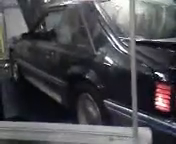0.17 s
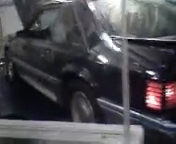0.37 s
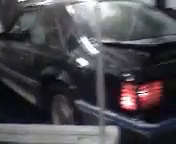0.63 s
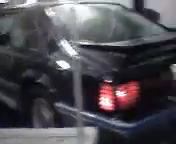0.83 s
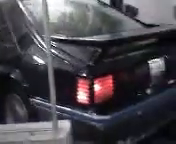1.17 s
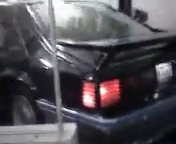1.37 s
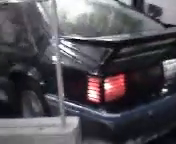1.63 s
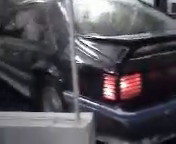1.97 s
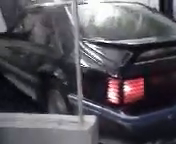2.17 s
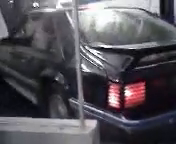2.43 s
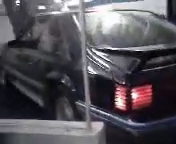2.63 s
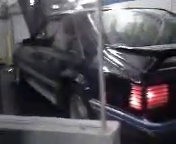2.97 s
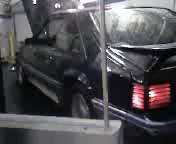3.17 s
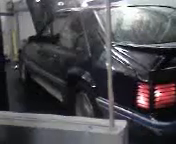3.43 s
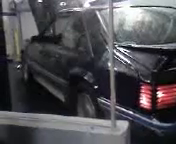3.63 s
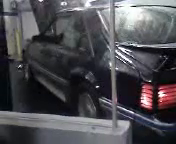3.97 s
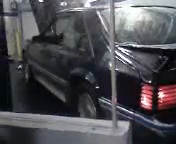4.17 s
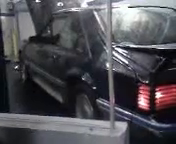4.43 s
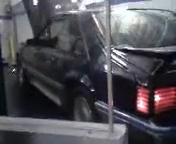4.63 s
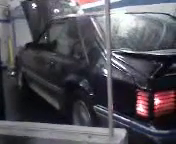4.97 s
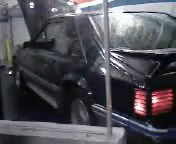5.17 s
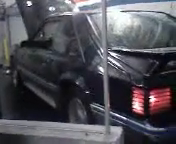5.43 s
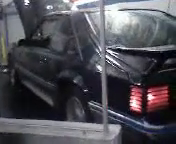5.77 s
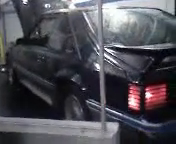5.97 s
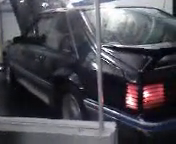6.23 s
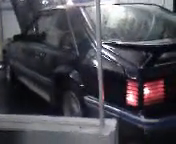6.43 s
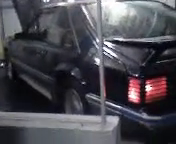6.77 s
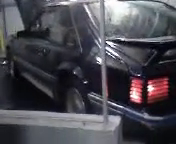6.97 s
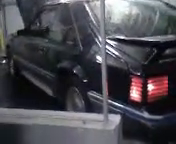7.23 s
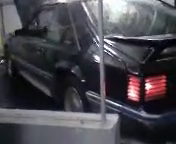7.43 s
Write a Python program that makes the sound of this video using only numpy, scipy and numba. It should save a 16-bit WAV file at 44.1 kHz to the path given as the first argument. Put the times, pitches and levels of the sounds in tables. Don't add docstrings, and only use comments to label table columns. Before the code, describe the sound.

A V8 car pulls hard on workshop rollers, its uneven exhaust note climbing under a loud tyre roar with squeals and brief overload.

```python
import sys
import numpy as np
from scipy import signal
from scipy.fft import rfft, irfft, next_fast_len
from scipy.io import wavfile
from scipy.ndimage import uniform_filter1d
from numba import njit

SR = 44100
rng = np.random.default_rng(int(sys.argv[2]) if len(sys.argv) > 2 else 0)


def generate_wav(sig):
    pcm = np.round(np.clip(np.atleast_2d(sig).T, -1, 1) * 32767).astype(np.int16)
    wavfile.write(sys.argv[1], SR, pcm)


def attenuation_scalar(level_db):
    decades = np.asarray(level_db, float) / 20
    return 10 ** decades


N = 334703
CEILING = 0.71


def unit(x):
    return x / np.sqrt(np.mean(x ** 2))


def level_out(x):
    return x / np.sqrt(uniform_filter1d(x ** 2, size=20000))


def curves(table):
    s, *columns = np.transpose(table)
    return [np.interp(np.arange(N) / SR, s, c) for c in columns]


@njit
def svf(x, hz, width):
    y, b, l = np.empty(len(x)), 0., 0.
    for i in range(len(x)):
        g = np.tan(np.pi * hz[i] / SR)
        k = width / hz[i]
        v = (b + g * (x[i] - l)) / (1 + g * (g + k))
        b, l = 2 * v - b, l + 2 * g * v
        y[i] = k * v
    return y


def band(x, hz, width):
    return svf(x, hz * np.ones(N), 1. * width)


def colour(x, table):
    size = next_fast_len(N)
    hz, db = np.transpose(table)
    log_hz = np.log(np.fft.rfftfreq(size, 1 / SR) + 1)
    gain = attenuation_scalar(np.interp(log_hz, np.log(hz), db))
    return irfft(rfft(x, size) * gain, size)[:N]


def walk(rate, size=N):
    k = int(SR / rate)
    steps = np.repeat(rng.standard_normal(size // k + 2), k)
    return 1.37 * uniform_filter1d(uniform_filter1d(steps, k), k)[:size]


def swell(start, length):
    return np.sin(np.pi * np.clip((np.arange(N) / SR - start) / length, 0, 1))


def clatter(cycle_hz):
    steps = 512
    place = np.cumsum(cycle_hz) / SR * steps
    pattern = uniform_filter1d(rng.standard_normal((260, steps)), size=7, axis=0).ravel()
    return unit(np.interp(place, np.arange(pattern.size), pattern))


def rollers(cycle_hz):
    # (time [s], level [dB])
    load = [(0, -20.5), (.3, -20.5), (2.3, -19), (3, -18.5), (3.7, -17), (5, -16.5), (6, -15.5),
            (6.7, -15.5), (6.9, -16), (7.59, -14.5)]
    # (multiple of cycle rate, width [Hz], boost [dB], change over the pull [dB])
    hums = [(34.3, 120, 2.5, 5), (53.9, 110, 3, -2), (58.8, 80, 5, -0.5), (69, 60, 1, 4.5), (81, 160, 5, 2),
            (116, 72, 3, -4)]
    # (centre [Hz], width [Hz], boost [dB], change over the pull [dB])
    shell = [(804, 12, 6.5, -2.5), (1096, 60, 4.5, 4), (1241, 25, 3.5, -1), (1740, 50, 3, -1),
             (1928, 100, 4, 2.5), (2100, 62, 2.5, 1), (2500, 48, -0.5, -4), (3350, 200, 1.5, 0)]
    # (frequency [Hz], density [dB per Hz])
    roar_spectrum = [(300, -26), (500, -7), (640, -12.5), (910, -13.5), (1160, -12), (1320, -8), (1620, -6),
                     (1870, -3), (2110, -4), (2370, -7), (3230, -14.5), (4500, -22), (6000, -51.5)]
    pull = np.arange(N) / N - .5
    roar = rng.standard_normal(N) + attenuation_scalar(-7.5) * clatter(cycle_hz)
    for multiple, width, boost_db, change_db in hums:
        boost = attenuation_scalar(boost_db + change_db * pull + 0.99 * walk(6.8)) - 1
        roar = roar + boost * band(roar, multiple * cycle_hz, width)
    for hz, width, boost_db, change_db in shell:
        boost = attenuation_scalar(boost_db + change_db * pull + 1.2 * walk(5)) - 1
        roar = roar + boost * band(roar, hz * (1 + 0.0058 * walk(2.5)), width)
    for hz in (1517, 1795, 2145, 2590, 3103):
        roar = roar + attenuation_scalar(-4 + 3 * walk(18)) * band(roar, hz * (1 + .03 * walk(12)), 60)
    for hz, patchy_db in [(900, 3.4), (1400, 1.9), (2300, 1.6), (3000, 2.6), (4100, 4.6)]:
        patches = (0.33 * walk(14) + walk(45)) / 1.28
        roar = roar + (attenuation_scalar(patchy_db * patches) - 1) * band(roar, hz, hz / 4)
    roar = colour(roar, roar_spectrum)
    upper_db = 2.3 + .35 * (cycle_hz - 25) + .7 * walk(5)
    top_db = -3.5 + 1.5 * walk(6)
    upper = signal.sosfilt(signal.butter(3, 2450, "high", fs=SR, output="sos"), roar)
    top = signal.sosfilt(signal.butter(3, 3600, "high", fs=SR, output="sos"), roar)
    roar += (attenuation_scalar(upper_db) - 1) * (upper - top) + (attenuation_scalar(top_db) - 1) * top
    return attenuation_scalar(curves(load)[0] + .5) * level_out(roar)


def squeals():
    # (start [s], length [s], start frequency [Hz], end frequency [Hz], level [dB])
    tones = [(0, 0.83, 1686, 1707, -31.5), (0.293, 0.58, 2530, 2550, -31.5),
             (1.56, 0.42, 2590, 2580, -36.5), (2.016, 0.45, 1853, 1877, -25.5),
             (2.299, 0.81, 1225, 1240, -31.5), (3.7, .7, 2010, 2060, -24), (4.24, .1, 2880, 2850, -28),
             (4.6, .4, 2020, 2110, -24), (5.15, .3, 2110, 2130, -22), (5.45, .45, 3180, 3260, -29),
             (5.748, 0.42, 1893, 1956, -23), (6.821, 0.12, 2080, 2565, -16), (6.96, .25, 1740, 1745, -19.5),
             (7.176, 0.12, 2235, 2100, -21), (7.28, .1, 2450, 3000, -26)]
    out = np.zeros(N)
    for start, length, from_hz, to_hz, db in tones:
        a = max(int(start * SR), 0)
        part = np.linspace(0, 1, num=out[a:a + int(length * SR)].size)
        glide_hz = from_hz + (to_hz - from_hz) * part ** 2
        hz = glide_hz * (1 + .008 * walk(30, size=part.size))
        flutter_db = np.clip(4.6 * walk(40, size=part.size), -12, 4)
        size = attenuation_scalar(db + flutter_db) * np.abs(np.sin(np.pi * part)) ** .5
        out[a:a + part.size] += size * np.sin(2 * np.pi * np.cumsum(hz) / SR)
    return out


def buffets(note_db):
    # (centre [s], length [s], extra level [dB])
    gusts = [
        (2.9, 0.13, 2.5),
        (3.5, .12, 5.5),
        (4.535, 0.16, 3.5),
        (5.64, 0.078, 4.5),
        (6.934, 0.29, 7),
        (7.185, 0.1, 6.5),
    ]
    # (frequency [Hz], density [dB per Hz])
    gas_spectrum = [(12, -40), (20, -20), (75, -17), (198, -14), (268, -8.5), (341, -9.5), (426, -2.5),
                    (665, -15), (900, -18), (1170, -50), (1980, -120)]
    buffet_db = -43 + 0.54 * (note_db + 24.5)
    for at, length, db in gusts:
        buffet_db = buffet_db + db * swell(at - length / 2, length)
    noise = unit(colour(rng.standard_normal(N), gas_spectrum)) * attenuation_scalar(0.83 * walk(13))
    return attenuation_scalar(buffet_db + 11) * noise


def blooms(turn):
    # (start [s], length [s], order [multiple of cycle rate], level [dB])
    crossings = [(0.448, 1.4, 18, -30.5), (0, 1.2, 13, -35), (0, 1.3, 12, -35), (1.2, 0.98, 16, -34.5),
                 (2.45, 1.22, 16, -21.5), (2.6, .8, 11, -30), (3.3, 0.99, 11, -32), (3.4, 1, 16, -22),
                 (3.498, 1, 18, -24.5), (3.4, 1.45, 12, -30), (3.8, .5, 21, -30), (4.3, .65, 16, -19),
                 (4.35, 0.48, 11, -20), (4.45, 0.56, 10, -37), (4.9, .4, 16, -20), (4.978, 0.24, 11, -25),
                 (5.301, .35, 11, -29), (5.25, .95, 16, -23.5), (5.302, 1.12, 10, -31),
                 (5.65, .35, 18, -27), (5.45, .75, 19, -31), (6.2, 1.24, 10, -24.5), (6.1, 0.77, 16, -29),
                 (6.698, 0.32, 11, -30.5), (6.65, .7, 14, -31)]
    out = np.zeros(N)
    for start, length, order, db in crossings:
        a = max(int(start * SR), 0)
        part = turn[a:a + int(length * SR)]
        size = attenuation_scalar(db + 1.3 * walk(7, size=part.size)) * np.hanning(part.size) ** .25
        out[a:a + part.size] += size * np.sin(round(order) * (part + 1) + .2 * walk(9, size=part.size))
    return out


def firing(turn):
    # (time [s], stage [0 at the start, .5 in the middle stretch, 1 at full
    stages = [(0, 0), (1.1, 0), (1.5, .5), (2.3, .5), (2.7, 1), (7.59, 1)]
    # (multiple of cycle rate, level at the start [dB], in the middle stretch [dB], at full load [dB])
    order_levels = [(8, -2.5, -1.5, -7), (9, -15.5, -18, -8), (12, 0, -10, -6), (13, -6, -18.5, -17.5),
                    (14, -5, -9, -7.5), (15, -13.5, -7, -5.5), (17, 0.5, -9, -2.5), (19, -3, -4, -6),
                    (20, -10, -9.5, -9), (21, -3.5, 0, -9), (22, -6.5, -15, -12.5), (23, -10.5, 0.5, -4),
                    (24, -4, 7, -12), (25, -6, -12.5, -9), (26, -13, -6, -18)]
    stage = np.clip(curves(stages)[0], 0, 1)
    orders = np.zeros(N)
    for order, *load_db in order_levels:
        db = np.interp(stage, [0, .5, 1], load_db) + 2.4 * walk(1.9) + 1.5 * walk(7)
        phase = 2 * np.pi * rng.random() + 0.22 * walk(9.9)
        orders += attenuation_scalar(db) * np.sin(round(order) * turn + phase)
    scatter = band(rng.standard_normal(N), 250, 530)
    return unit(orders) + attenuation_scalar(1.0) * unit(scatter)


def exhaust(cycle_hz):
    # (time [s], level [dB])
    effort = [(0, -28), (.55, -25.5), (1.4, -30), (2.3, -29.5), (2.75, -22.5), (3.3, -20.5), (3.43, -25.5),
              (3.6, -15.5), (3.75, -24), (3.9, -18.5), (4.6, -15.5), (4.97, -22), (5.06, -18.5),
              (5.25, -26.5), (5.8, -19.5), (6.25, -23.5), (6.95, -22), (7.59, -24.5)]
    # (centre [Hz], width [Hz], level [dB])
    modes = [(176.7, 15, -12.5), (289, 66, -5.5), (406.4, 77.4, 0.5), (539.6, 67, -7.5), (762, 29, -15)]
    note_db = curves(effort)[0]
    turn = 2 * np.pi * np.cumsum(cycle_hz) / SR
    gas = firing(turn)
    pipe = np.zeros(N)
    for k, (hz, width, db) in enumerate(modes):
        ringing = band(band(gas, hz, 1.5 * width), hz, 1.5 * width)
        pipe += (-1) ** k * attenuation_scalar(db) * ringing
    return blooms(turn) + attenuation_scalar(note_db - 4.5) * level_out(pipe) + buffets(note_db)


def scene():
    # (time [s], rate [Hz])
    revs = [(0, 20.82), (1, 21.57), (2, 22.23), (2.8, 22.95), (3.5, 23.78), (4.4, 25.1), (5.1, 26.15),
            (5.9, 27.57), (6.6, 29), (7.1, 30.12), (7.59, 31.09)]
    cycle_hz = curves(revs)[0]
    return (exhaust(cycle_hz) + rollers(cycle_hz) + squeals())[None]


def overload(x):
    # (time [s], minus = downward swing)
    over_s = [-3.167, -3.6527, -4.0148, -4.5838, -4.6256, -4.7015, 5.7813, -5.8419, -6.1423, 6.814, -7.0054,
              7.1302, -7.1327, -7.2205]
    over_levels = [-27, -30, -39, -30, -43, -18, -13.5, -21.5, -24, -16, -30, -12, -9.5, -15]
    # (time [s], level [dB])
    ticks = [
        (4.0085, -57),
        (4.7152, -55),
        (5.7719, -62),
        (5.8494, -50),
        (6.1542, -64),
        (6.8278, -58),
        (7.0086, -57),
        (7.1159, -50),
        (7.2111, -58),
    ]
    x, k = x.copy(), np.arange(-100, 101)
    t = k / SR
    window = np.exp(-(t / .0005) ** 2)
    for at, over_db in zip(over_s, over_levels):
        i = round(abs(at) * SR) + k
        peak = np.sign(at) * CEILING * (1 + attenuation_scalar(over_db)) * np.cos(2 * np.pi * 1800 * t)
        x[i] = x[i] * (1 - window) + peak * window
    for at, db in ticks:
        x[round(at * SR) + k] += attenuation_scalar(db) * np.exp(-(t / .0003) ** 2) * np.sin(2 * np.pi * 5000 * t)
    return x


def low_pass(x):
    return signal.sosfilt(signal.butter(12, 15830, fs=SR, output="sos"), x)


def record(dry):
    # (frequency [Hz], gain [dB])
    converter = [(3300, 0), (3700, -8), (4050, -15.5), (4350, -24.5), (4550, -38), (4700, -67.5),
                 (5000, -110)]
    knee = .5
    room = CEILING - knee - .11
    size = np.abs(dry[0])
    over = np.maximum(size - knee, 0)
    x = np.sign(dry[0]) * (np.minimum(size, knee) + room * np.tanh(over / room))
    x = overload(colour(x, converter))[None]
    clipped = np.clip(x, -CEILING, CEILING)
    mix = signal.lfilter([.06, .88, .06], 1, clipped)
    return low_pass(mix)


dry = scene()
out = record(dry)
generate_wav(out)
```